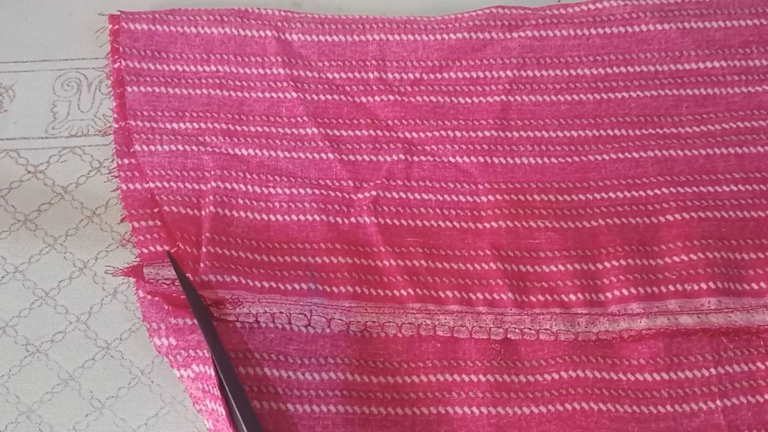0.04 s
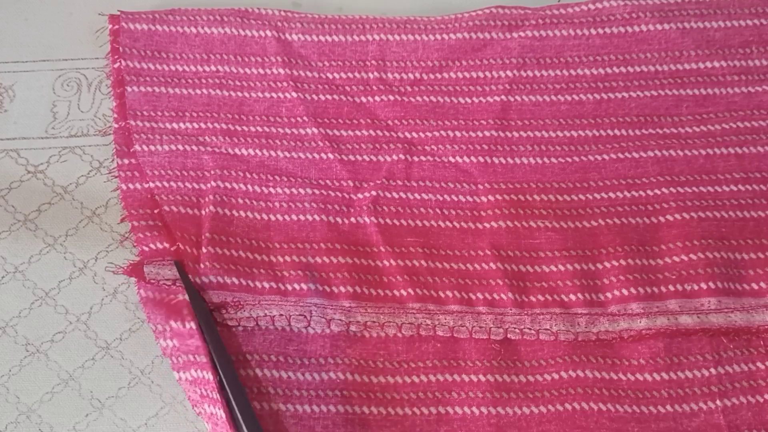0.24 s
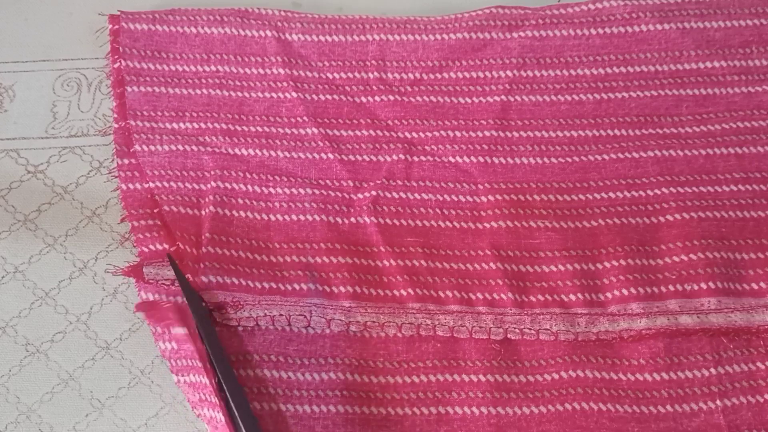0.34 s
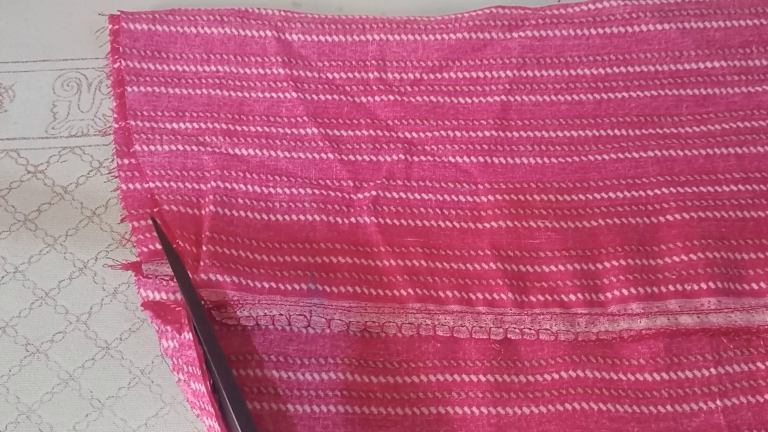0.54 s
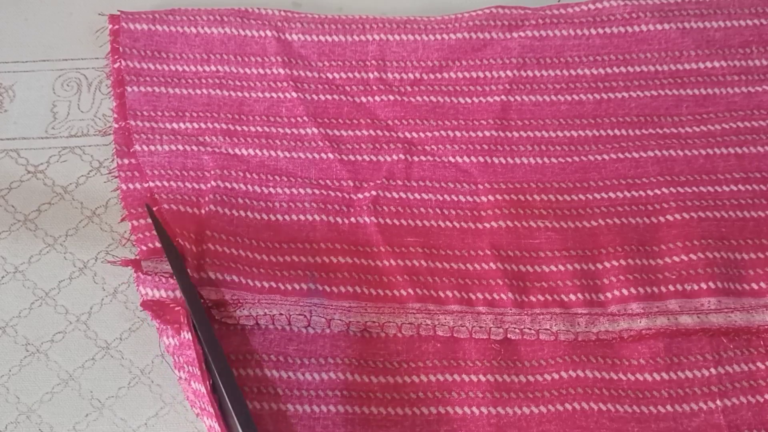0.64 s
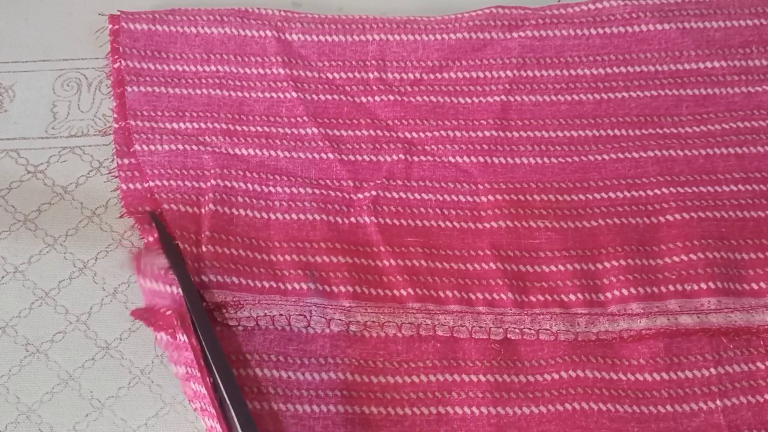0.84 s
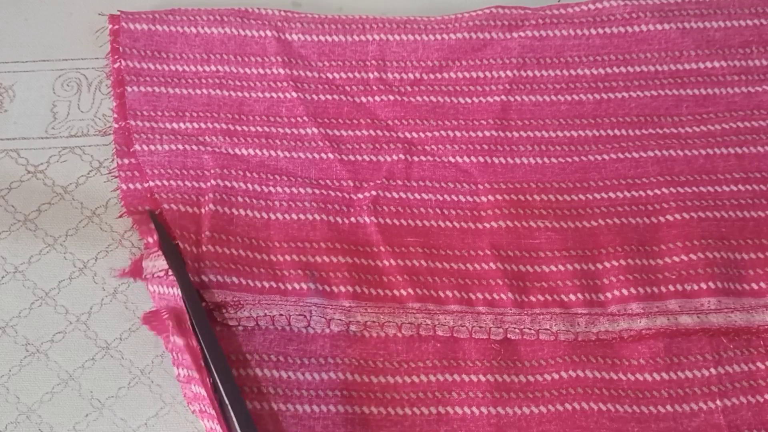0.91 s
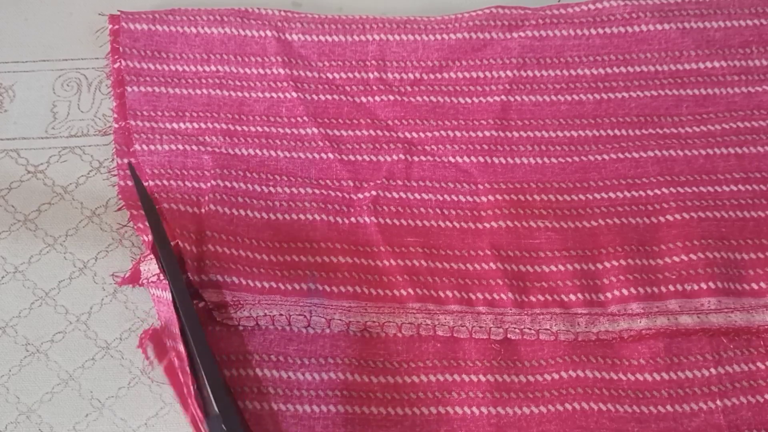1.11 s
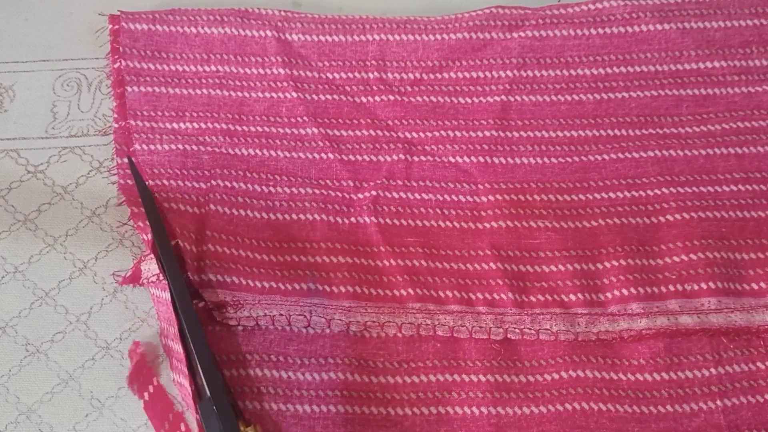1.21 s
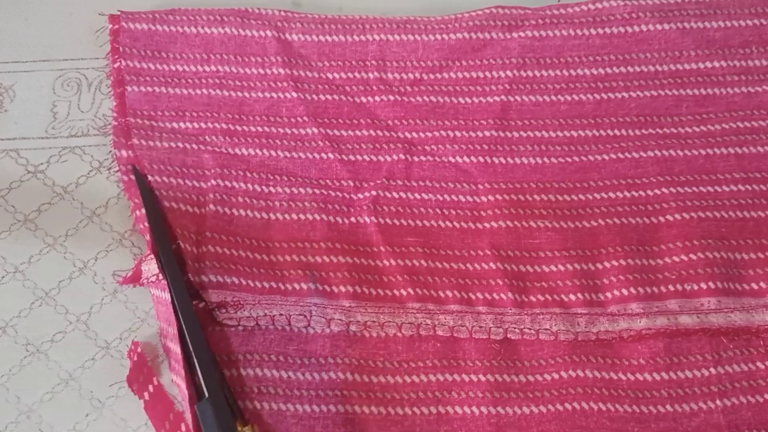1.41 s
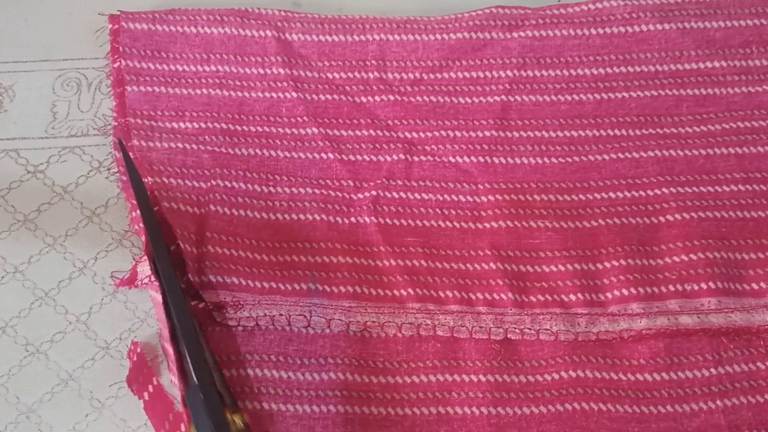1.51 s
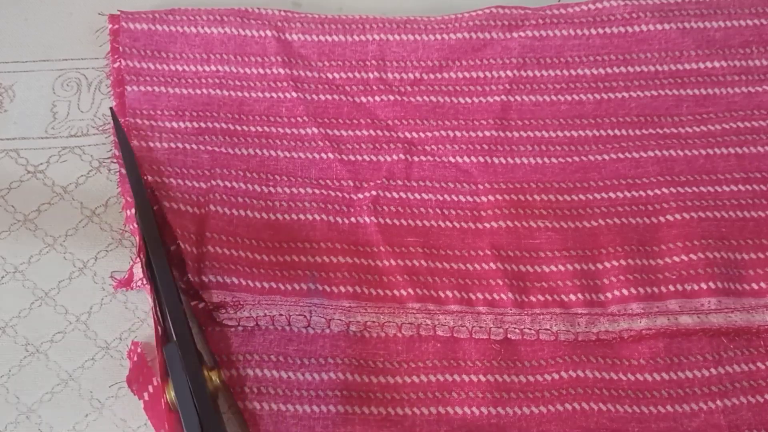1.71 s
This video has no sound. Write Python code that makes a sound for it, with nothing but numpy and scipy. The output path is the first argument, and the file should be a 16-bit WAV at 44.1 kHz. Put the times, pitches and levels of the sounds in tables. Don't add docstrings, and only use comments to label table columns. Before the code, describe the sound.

Three crunchy scissor cuts through fabric, with dull table knocks, faint steel squeaks and cloth rustle

```python
import sys
import numpy as np
from scipy import signal
from scipy.fft import rfft, irfft
from scipy.io import wavfile
from scipy.ndimage import uniform_filter1d

SR = 44100
rng = np.random.default_rng(int(sys.argv[2]) if len(sys.argv) > 2 else 0)


def int16_out(signal):
    q = np.round(np.clip(np.atleast_2d(signal).T, -1, 1) * 32767)
    wavfile.write(sys.argv[1], SR, q.astype(np.int16))


def magnitude_from_level(level_db):
    exponent = np.asarray(level_db, float) / 20
    return 10 ** exponent


N = 77175
T = np.arange(N) / SR

# [t/s, length/s, level/dB, swell over the burst/dB, crispness/dB]
FIRST_SNIP = [(.098, 0.0067, -69, -10, -4), (.106, 0.0035, -70, 3, 3), (.127, 0.015, -61, -2, -0.5),
              (.148, .008, -72, -3, -4), (.157, 0.025, -53.5, -0.5, -1.5), (.195, 0.007, -48.5, 12, -1),
              (.204, 0.025, -40.5, 0.5, -3), (.223, 0.03, -47, 4, 0), (.249, 0.036, -73, -1, 4),
              (.2745, 0.0059, -41, 11, -5), (.2805, 0.004, -39, 3, 7.5), (.288, .012, -61, -6, 2)]
SECOND_SNIP = [
    (.738, 0.0031, -66, 0, -1),
    (.751, 0.0079, -69, -3, 3.5),
    (.765, 0.011, -61.5, -3, 0),
    (.784, 0.0031, -44.5, 13.5, -18),
    (.799, 0.039, -53, 16, -6),
    (.831, 0.02, -42.5, 8.5, -1),
    (.855, 0.046, -53.5, 8, -11),
    (.881, 0.02, -45.5, -3, -6),
    (.898, 0.017, -43, 5.5, 5),
    (.919, 0.024, -65, -16, 4),
]
THIRD_SNIP = [
    (1.302, .012, -75, 11, 1.5),
    (1.314, .019, -59, 0, -0.5),
    (1.333, 0.021, -56, 9, 6),
    (1.350, 0.03, -44, 5, -12),
    (1.377, 0.01, -47, 12, 7),
    (1.388, 0.011, -43, 1, 2.5),
    (1.401, 0.01, -53, 0, 5),
    (1.411, 0.013, -45, 1, 5),
    (1.426, 0.035, -55, -7, -11),
]
# [f/Hz, width/Hz, level/dB]
FIRST_BLADES = [(2390, 99, -30), (4300, 290, -3), (6600, 410, -10), (7840, 150, 3), (9830, 240, -12),
                (13000, 200, -14), (14500, 860, -11)]
SECOND_BLADES = [(2490, 250, -16.5), (4400, 170, 0.5), (6180, 610, -3.5), (8000, 900, 4), (9470, 780, -2),
                 (13100, 570, 0), (15700, 550, -2.5)]
THIRD_BLADES = [(3710, 130, -18), (4750, 220, -12.5), (5300, 520, -4), (6570, 270, -0.5), (7500, 570, -1.5),
                (9140, 520, 5), (13600, 1300, 0), (15600, 650, 8)]
# [f/Hz, level/dB]
FIBRE_COLOUR = [(710, -52), (1200, -23.5), (2950, -12.5), (4410, -3.5), (5710, -38), (7740, -8),
                (11900, -16.5), (14800, -7), (16000, -5)]
# [t/s, length/s, level/dB, f/Hz]
SQUEAKS = [(0.129, .018, -66, 4320), (.161, 0.031, -51.5, 13200), (0.167, 0.02, -58, 4300),
           (0.162, 0.016, -59, 9700), (0.18, 0.055, -50.5, 664), (0.368, 0.044, -70, 4490),
           (0.391, .046, -66.5, 7320), (.42, 0.034, -72, 8000), (0.748, 0.016, -64, 8040),
           (.798, 0.029, -60, 8000), (0.801, 0.05, -59, 4400), (.835, 0.017, -52, 5500),
           (0.9, 0.011, -54, 4470), (.905, 0.0074, -55, 4450), (0.91, 0.0053, -49, 12900),
           (0.209, 0.026, -49, 4450), (0.998, 0.043, -62.5, 7350), (1.009, .02, -64, 9500),
           (1.03, .04, -66, 8000), (1.31, 0.032, -61, 4290), (1.326, 0.027, -56.5, 4400),
           (1.35, .02, -52, 4570), (1.35, 0.026, -43.5, 9000), (1.413, 0.013, -52.5, 3926),
           (1.484, 0.046, -64, 6970), (1.506, 0.035, -66.5, 8680), (1.52, 0.043, -68, 7300),
           (0.201, 0.056, -60.5, 2450), (0.21, 0.044, -54, 505), (1.143, 0.064, -55, 480),
           (1.152, 0.047, -56.5, 724), (1.233, 0.036, -53, 640), (1.307, 0.055, -38.5, 171.3),
           (1.351, 0.036, -48, 198), (1.389, 0.032, -47.5, 651), (1.355, 0.018, -70, 5500),
           (1.388, .015, -52, 6300), (1.488, 0.055, -61.5, 605), (1.56, .025, -67, 3600),
           (1.567, 0.019, -47, 345)]
# [t/s, length/s, level/dB, f/Hz]
LOW_SQUEAKS = [
    (.828, .036, -39, 712),
    (.833, .04, -43, 620),
    (.872, .03, -46, 670),
    (.898, .03, -44.5, 680),
    (.925, .028, -50, 720),
    (.845, .03, -54, 920),
]
# [t/s, level/dB, f/Hz]
TICKS = [
    (.42, -60, 2000),
    (1.149, -57, 900),
    (1.161, -48, 2300),
    (1.165, -52, 3300),
    (1.25, -57, 2000),
    (1.524, -55, 4600),
    (1.585, -51, 3700),
    (1.668, -53, 900),
]
# [t/s, length/s, level/dB]
SLIDES = [(.11, 0.21, -62.5), (.27, 0.18, -66), (.33, 0.22, -66), (.46, 0.41, -77.5), (.74, 0.27, -58),
          (.8, 0.26, -60.5), (.92, 0.27, -69), (1.14, 0.18, -67.5), (1.29, 0.083, -67), (1.41, 0.21, -65.5),
          (1.47, 0.19, -68), (1.56, 0.32, -71.5)]
# [f/Hz, width/Hz, level/dB]
SLIDE_TONES = [(4450, 730, 0.5), (7590, 420, 0.5), (14600, 990, 0.5)]
# [t/s, length/s, boom level/dB, overtones above the boom/dB]
PRESSES = [(0.074, 0.11, -53.5, -7), (0.146, 0.074, -37.5, -7), (0.181, 0.11, -40.5, -0.5),
           (0.302, 0.1, -43.5, -7), (0.343, 0.16, -40, -5), (0.475, 0.12, -55, -3), (0.593, 0.18, -52, -10),
           (0.732, 0.12, -38.5, -5.5), (0.796, 0.13, -33, -10), (0.895, 0.064, -32.5, -4),
           (0.929, 0.22, -45, -3), (1.125, 0.17, -40, -14), (1.279, 0.14, -43, -1),
           (1.351, 0.15, -30.5, -16.5), (1.461, 0.15, -46, 0.5), (1.643, 0.16, -57, -10)]
# [t/s, level/dB, contact time/s]
KNOCKS = [
    (0.2864, -22, 0.0019),
    (0.3033, -23.5, 0.0032),
    (0.843, -35, 0.002),
    (0.908, -23.5, 0.0075),
    (1.155, -71, 0.0018),
    (1.195, -44.5, 0.0036),
    (1.375, -35.5, 0.00073),
    (1.588, -48, 0.0022),
]
# [f/Hz, level/dB, time to fall by 60 dB/s]
TABLE_MODES = [(116.6, -4, 0.22), (130.3, 8, 0.086), (173.1, -2, 0.14), (221.5, -14, 0.13),
               (274, -31.5, 0.048), (324, -13.5, 0.09), (370, -36.5, 0.3), (485, -16, 0.047),
               (620, -23.5, 0.2), (697, -20.5, 0.14)]
# [t/s, length/s, level/dB]
DRAGS = [(.13, 0.3, -54.5), (.28, 0.023, -42.5), (.35, .16, -57), (.5, 0.3, -63), (.75, 0.17, -55.5),
         (.82, .14, -54), (.98, 0.11, -53), (1.143, 0.072, -49.5), (1.225, 0.067, -53), (1.34, 0.086, -50),
         (1.47, 0.14, -55), (1.58, 0.16, -66), (1.66, 0.016, -61)]
# [f/Hz, level/dB]
CLOTH_COLOUR = [(150, 1.5), (250, -5), (340, 0.5), (450, -9), (680, -12), (1100, -17.5), (4000, -38),
                (6000, -75)]
# [f/Hz, level/dB]
ROOM_COLOUR = [(100, -12), (300, 13), (700, -8), (1400, -11.5), (3000, -20), (5000, -7.5), (10000, -24),
               (15500, -17)]


def unit(x):
    return x / np.sqrt(np.mean(x ** 2))


def colour(x, points):
    hz, db = np.array(points).T
    f = np.fft.rfftfreq(N, 1 / SR) + 1
    return irfft(rfft(x) * magnitude_from_level(np.interp(np.log(f), np.log(hz), db)), N)


def low_pass(x, hz):
    return signal.sosfilt(signal.butter(4, hz, fs=SR, output="sos"), x)


def high_pass(x, hz, order):
    return signal.sosfilt(signal.butter(order, hz, "high", fs=SR, output="sos"), x)


def ring(x, hz, width):
    b, a = signal.iirpeak(hz, hz / width, fs=SR)
    return signal.lfilter(b, a, x)


def noise():
    return rng.standard_normal(N)


def walk(rate):
    hold = int(SR / rate)
    steps = np.repeat(rng.standard_normal(N // 8), hold)[:N]
    return unit(uniform_filter1d(steps, hold))


def clicks(per_s, spread_db):
    chance, side, size = rng.random((3, N))
    biggest = 2.8
    size_db = spread_db * np.minimum(-np.log(size + 1e-9), biggest)
    return unit((chance < per_s / SR) * np.sign(side - .5) * magnitude_from_level(size_db))


def hump(t, length):
    return np.sin(np.pi * np.clip((T - t) / length, 0, 1))


def gestures(rows, rest_db, roundness):
    power = sum(magnitude_from_level(2 * db) * hump(t, length) ** roundness for t, length, db in rows)
    return np.sqrt(power + magnitude_from_level(2 * rest_db))


def snip(bursts, blades):
    edge_s, release_s = .002, .0015
    body, crisp = np.zeros(N), np.zeros(N)
    for t, length, db, swell_db, crisp_db in bursts:
        x = T - t
        gate = np.clip(x / edge_s, 0, 1) * np.exp(-np.clip(x - length, 0, None) / release_s)
        gate = gate * magnitude_from_level(db + swell_db * (np.clip(x / length, 0, 1) - .5))
        body = body + gate
        crisp = crisp + gate * magnitude_from_level(crisp_db)
    threads = clicks(18000, spread_db=2.3) * magnitude_from_level(1.8 * walk(800))
    patches_db = [2.2 * walk(90) for _ in blades]

    def steel(x):
        out = 0
        for k, (hz, width, db) in enumerate(blades):
            out = out + (-1) ** k * magnitude_from_level(db + patches_db[k]) * ring(x, hz, width) * np.sqrt(300 / width)
        return out

    steel_rms = np.std(steel(threads))
    fibre_rms = np.std(colour(threads, FIBRE_COLOUR))

    def voice(x):
        return steel(x) / steel_rms + magnitude_from_level(-7) * colour(x, FIBRE_COLOUR) / fibre_rms

    return low_pass(voice(threads * (body - crisp)), 12600) + voice(threads * crisp)


def rough_tones(rows):
    out = np.zeros(N)
    drift = np.cumsum(130 * walk(970)) / SR
    rough_db = 4.0 * walk(350)
    for t, length, db, hz in rows:
        on = slice(int(t * SR), int((t + length) * SR))
        share = min(hz / 4000, 1)
        swell = hump(t, length)[on] ** .5
        tone = np.sin(2 * np.pi * (hz * T[on] + share * drift[on]))
        out[on] += magnitude_from_level(db + np.sqrt(share) * rough_db[on]) * swell * tone
    return out


def squeaks():
    return rough_tones(SQUEAKS)


def low_squeaks():
    return rough_tones(LOW_SQUEAKS)


def ticks():
    out = 0
    grit = unit(ring(noise(), 5400, 4700))
    for t, db, hz in TICKS:
        x = np.clip(T - t, 0, None)
        ping = np.sin(2 * np.pi * hz * x) * np.exp(-x / 0.00096)
        scrape = .4 * grit * np.exp(-x / 0.0013)
        out = out + magnitude_from_level(db) * (x > 0) * (ping + scrape)
    return low_pass(out, 7000)


def slide():
    tones = 0
    for hz, width, db in SLIDE_TONES:
        tones = tones + magnitude_from_level(db + 2.0 * walk(23.96)) * unit(ring(noise(), hz, width))
    hiss = unit(ring(clicks(15000, spread_db=1.9), 3760, 4250))
    glide = unit(unit(tones) + magnitude_from_level(1.5) * hiss)
    return gestures(SLIDES, rest_db=-82, roundness=2.3) * magnitude_from_level(1.23 * walk(59.74)) * glide


def table_top(force):
    out = 0
    for hz, db, t60 in TABLE_MODES:
        pole = np.exp(2j * np.pi * hz / SR - np.log(1000) / (t60 * SR))
        out = out + magnitude_from_level(db) * signal.lfilter([1], [1, -pole], force).imag
    return out


def presses():
    boom_rows = [(t, length, db) for t, length, db, over_db in PRESSES]
    rub_rows = [(t, length, db + over_db) for t, length, db, over_db in PRESSES]
    press = gestures(boom_rows, rest_db=-66, roundness=3.7)
    rub = gestures(rub_rows, rest_db=-73, roundness=2.0)
    boom_hz = 116.64 + 6.92 * walk(20)
    boom = np.sqrt(2) * np.sin(2 * np.pi * np.cumsum(boom_hz) / SR) * magnitude_from_level(2.03 * walk(39.27))
    upper = unit(high_pass(table_top(noise()), 150, order=3))
    rumble_hz, rumble_db, rumble_floor_db = 51.5, -18, -62
    rumble = unit(ring(noise(), rumble_hz, rumble_hz / 2))
    return boom * press + upper * rub + rumble * (magnitude_from_level(rumble_db) * press + magnitude_from_level(rumble_floor_db))


def knocks():
    force = 0
    for t, db, contact in KNOCKS:
        push = hump(t, contact) ** 2
        force = force + magnitude_from_level(db) * push / push.sum()
    return table_top(force)


def drag():
    rustle = unit(colour(clicks(8000, spread_db=1.12) * magnitude_from_level(1.45 * walk(70)), CLOTH_COLOUR))
    return gestures(DRAGS, rest_db=-75, roundness=0.95) * rustle


def room_echo(steel):
    echo_db, echo_t60_s = -16, .1
    n = SR // 4
    tail = rng.standard_normal(n) * magnitude_from_level(-60 * T[:n] / echo_t60_s)
    return signal.fftconvolve(steel, magnitude_from_level(echo_db) * tail / np.sqrt(np.sum(tail ** 2)))[:N]


def room_tone():
    tone = colour(noise(), ROOM_COLOUR)
    return magnitude_from_level(-77) * tone / np.std(high_pass(tone, 300, order=2))


def scene():
    cuts = snip(FIRST_SNIP, FIRST_BLADES) + snip(SECOND_SNIP, SECOND_BLADES) + snip(THIRD_SNIP, THIRD_BLADES)
    steel = cuts + squeaks() + low_squeaks() + ticks()
    table = presses() + knocks()
    return (steel + room_echo(steel) + slide() + table + drag() + room_tone())[None]


def roll_off(x):
    return signal.sosfilt(signal.butter(12, 16440, fs=SR, output="sos"), x)


def record(dry):
    x = high_pass(dry, 86.3, order=3)
    x = signal.sosfilt(signal.ellip(10, .2, 70, 15500, fs=SR, output="sos"), x)
    return roll_off(x)


dry = scene()
out = record(dry)
int16_out(out)
```